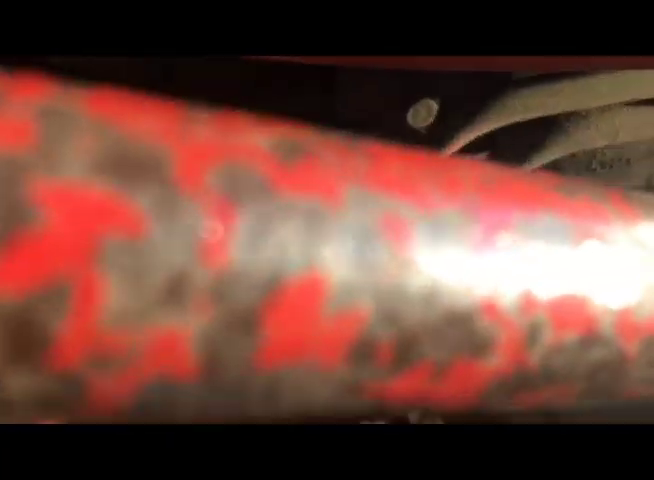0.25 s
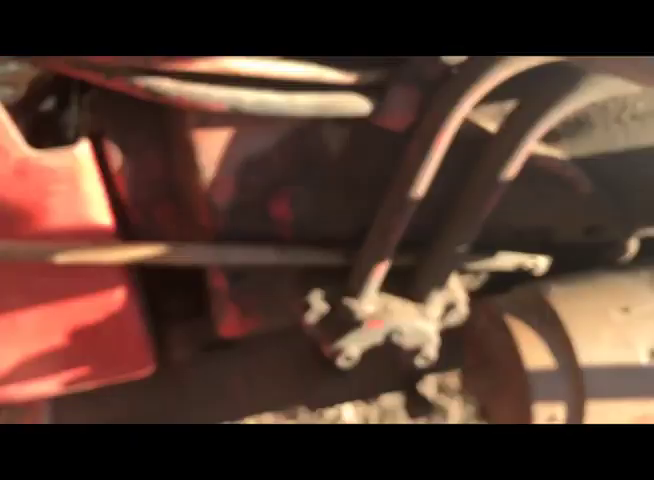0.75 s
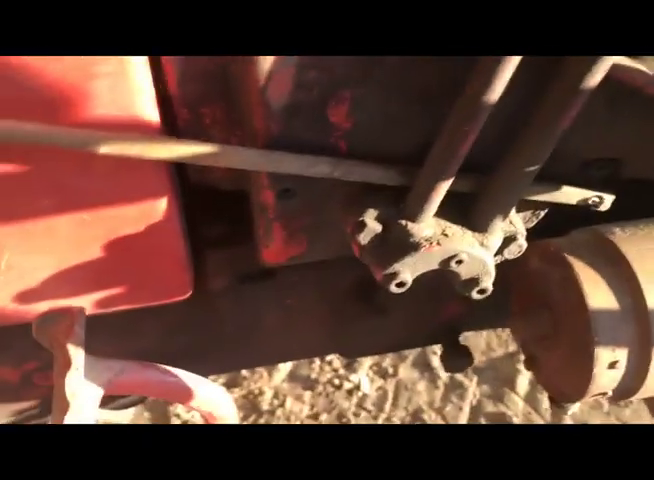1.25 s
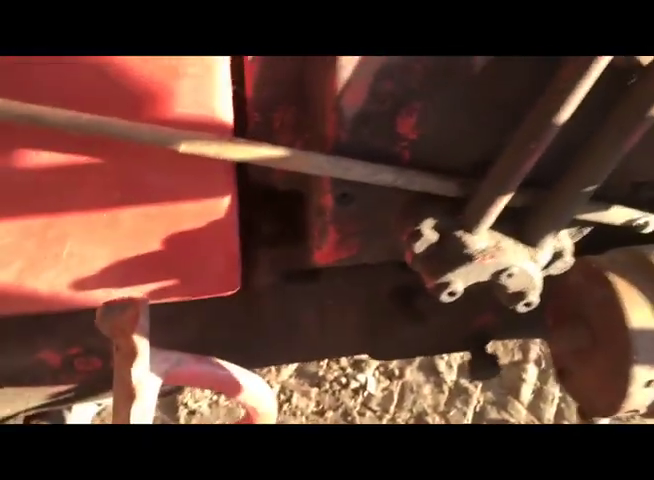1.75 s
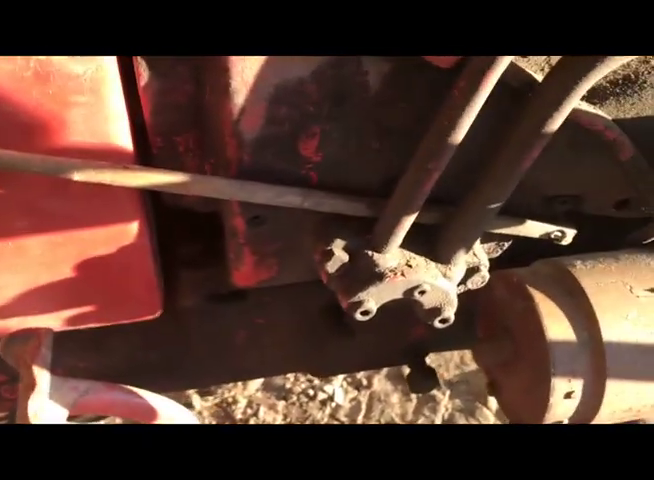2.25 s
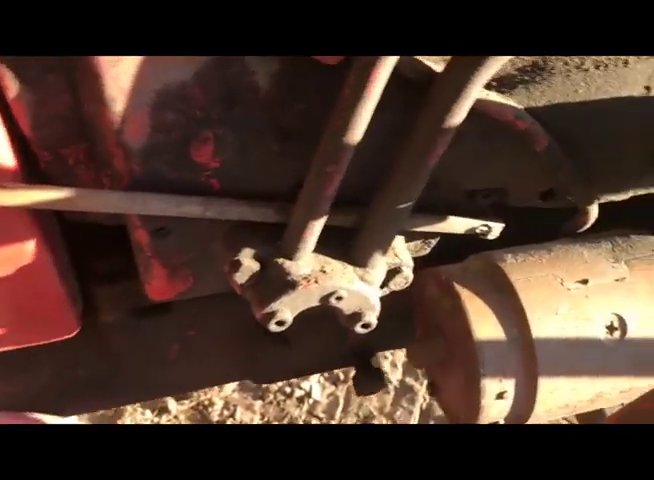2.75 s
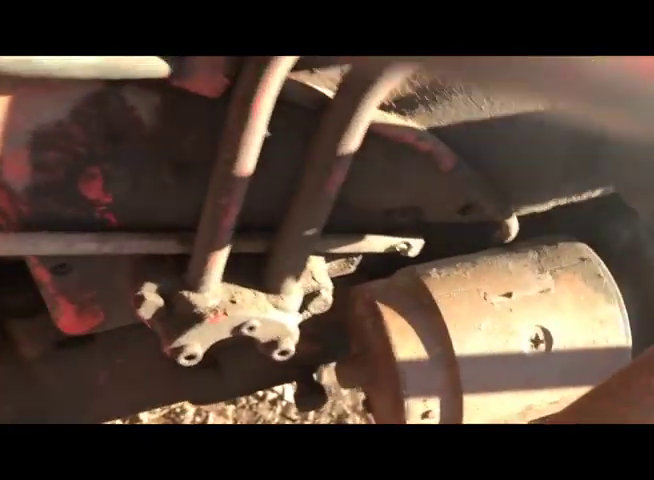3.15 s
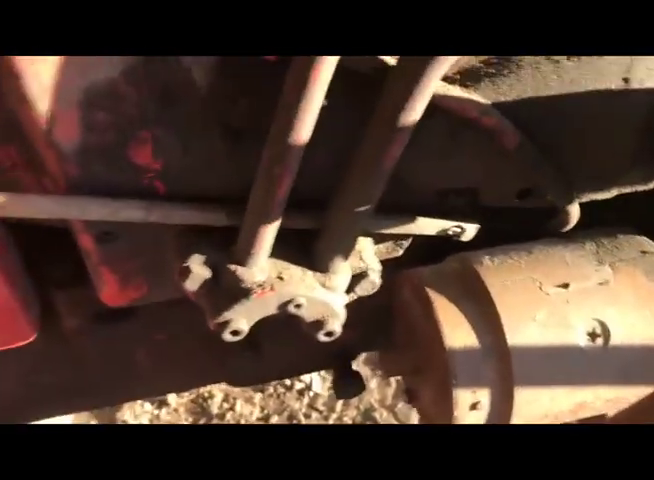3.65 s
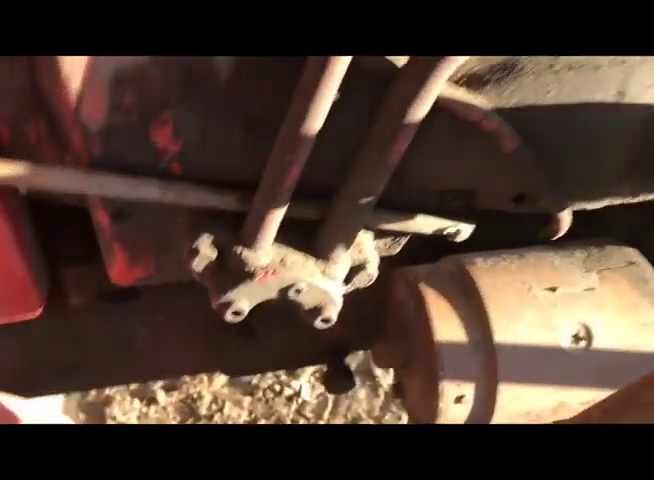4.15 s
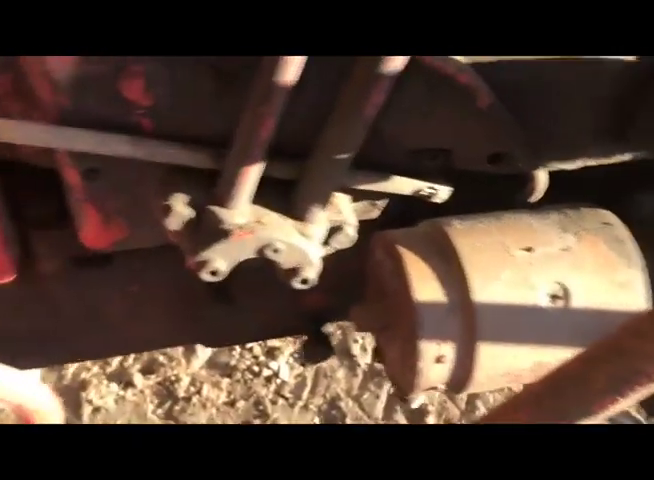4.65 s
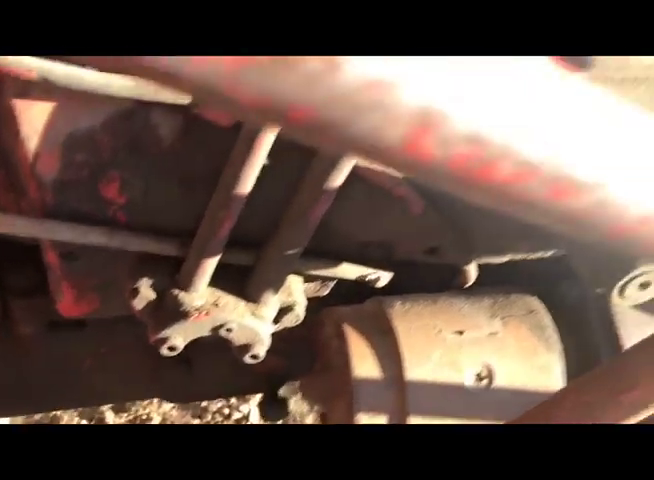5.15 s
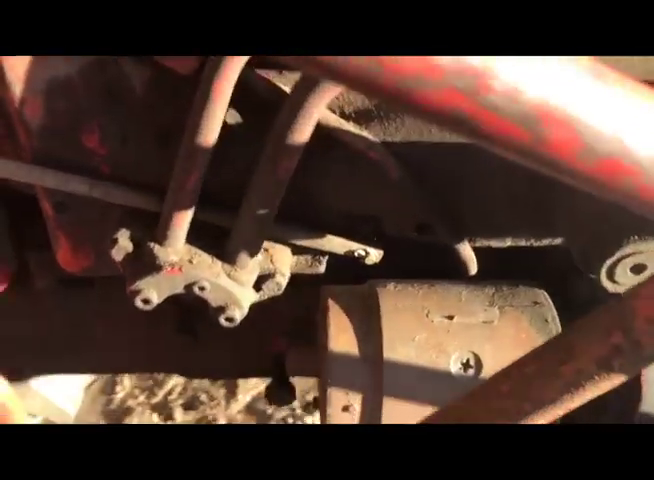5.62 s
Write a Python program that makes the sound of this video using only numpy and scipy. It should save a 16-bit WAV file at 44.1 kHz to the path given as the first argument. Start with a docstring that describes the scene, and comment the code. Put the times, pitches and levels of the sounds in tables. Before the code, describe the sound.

After a few light metal clicks, a tractor's electric starter motor kicks in with a sharp clack and spins freely, its whine rising fast and then winding down with a rhythmic scrape. A steel linkage clacks several times, and the starter spins again, faster, and coasts down. The engine never turns over. It is close to the microphone, outdoors, with gusts of wind thumping over a soft hush.

```python
"""Tractor starter in a breeze

A starter motor spins up freely twice and coasts down, close to the microphone. Brushes sing on the
commutator bars, the worn shaft scrapes once a turn and the steel housing roars and rings. Around the
spins a linkage clacks and a loose part tinkles; wind thumps on the microphone over a soft hush."""
import sys
import numpy as np
from scipy.fft import rfft, irfft, next_fast_len
from scipy.io import wavfile
from scipy.ndimage import uniform_filter1d, map_coordinates

SR = 44100
rng = np.random.default_rng(int(sys.argv[2]) if len(sys.argv) > 2 else 0)


def int16_out(signal):
    """Quantize to a 16-bit WAV file."""
    q = np.round(np.clip(np.atleast_2d(signal).T, -1, 1) * 32767)
    wavfile.write(sys.argv[1], SR, q.astype(np.int16))


N = 259552
TIME = np.arange(N) / SR

# The two spins. Each row: switch-on and switch-off in seconds, kick and free shaft speed in Hz, run-up
# time constant in seconds, dry drag in Hz per second, a moment in seconds when the high spot bites.
SPINS = [(1.498, 1.73, 13.5, 63.5, .078, 49.5, 2.583), (4.414, 4.78, 13, 92.7, .187, 47, 5.766)]
# The mix, before speed shapes it. Each row is a spin: roar, scrape and whine level in dB.
SPIN_MIX = [(-22.5, -23.5, -27.5), (-23.5, -21.5, -26.5)]
# Character. Each row is a spin: hum in dB, brush bounce as a factor, housing lift on the scrape in dB.
SPIN_CHARACTER = [(-42, .7, 15), (-33.5, .36, 9)]
# Tonal trims. Each row is a spin: housing ring in dB, trims of the low and the high bar tones in dB.
SPIN_TRIMS = [(-32, -3, -5), (-36, 3, 0)]
# Armature shudders. Each row: start in seconds, roar boost in dB, scrape boost in dB, decay in seconds.
SHUDDERS = [(1.493, 9.5, 7, 0.16), (4.631, 6.5, 2.5, 0.053), (4.882, -4.5, 1.5, 0.089)]
# Bar tones. Each row: multiple of the bar rate, level in dB, sideband fall in dB per shaft order.
BAR_TONES = [(1, 5, 6), (2, 0, 5), (3, -3.5, 3.5), (4, -5, 3.5)]
# Resonances the whine sweeps through. Each row: centre and width in Hz, then weight in dB running
# free and under starting current.
WHINE_MODES = [(975, 390, 2, 7.5), (1415, 56, 1.5, 5.5), (2196, 480, -1.5, 9), (3680, 470, 6, -11),
               (4040, 440, 1.5, -6), (4550, 240, 1.5, 9), (5080, 180, 1.5, 9), (5860, 450, 0.5, 10.5),
               (7300, 690, 1, 14), (8400, 540, 4, 6)]
# Colour of the brush friction. Each row: frequency in Hz, level in dB.
BRUSH_EQ = [(2000, -26.5), (3500, -15.5), (4500, -13), (5480, -13), (7220, -2.5), (10200, 0.5),
            (11500, 0.5), (16000, -15.5)]
# Brush holder resonances. Each row: centre and width in Hz, weight in dB in spin one and in spin two.
HOLDER_MODES = [(6030, 140, -2, -4), (7250, 220, -3, -3), (8500, 260, -9, -2), (9065, 50, 1, -1),
                (11080, 300, -5, -3), (11820, 190, 4, 1)]
# Broad colour of the housing, one curve a spin. Each point: frequency in Hz, weight in dB.
HOUSING_EQ = [
    [(70, -36), (130, 0), (240, -1), (370, 3.5), (537, -9.5), (641, -5), (1280, -8), (1450, -3.5),
     (2400, -5), (2900, -16.5), (3500, -17), (4050, -7), (5100, -18.5), (9000, -18), (12000, -65.5)],
    [(70, -5.5), (130, -0.5), (240, 3), (383, 4), (556, -14), (641, -2.5), (1210, -5), (1420, -4.5),
     (2300, -2), (2850, -12), (3500, -21.5), (4050, -15.5), (5480, -16.5), (9000, -23), (12000, -34)],
]
# Housing resonances. Each row: centre in Hz, width in Hz, weight in dB.
HOUSING_MODES = [(162.3, 18, 5.5), (375, 260, -4), (616, 44, 7), (1072, 350, 6), (1459, 13, 8),
                 (2220, 160, -0.5), (3743, 730, 10.5), (5300, 130, -0.5), (6070, 150, 1), (7330, 720, -7.5),
                 (13100, 200, -14)]
# Bands the housing hardly radiates. Each row: centre in Hz, width in Hz, depth in dB.
HOUSING_NOTCHES = [(2900, 70, 8), (10480, 690, 9), (12160, 420, 5), (13500, 430, 6)]
# Linkage hits, plus two rows (1.785 s, 4.811 s) where the spinning-down motor shakes the link's low ring with
# next to no crack. Each row: start in seconds, then level in dB of the crack and the low, dull, bright rings.
CLACKS = [(0.3289, -35, -40.5, -32.5, -46), (.992, -51, -70, -62, -60), (1.007, -55, -70, -62, -59),
          (1.0608, -73, -41, -64, -64), (1.093, -46, -48, -62, -50), (1.167, -29.5, -32, -56, -33),
          (1.18, -47, -55, -28, -36), (1.263, -48, -35.5, -43, -48), (1.501, -13.5, -39, -21, -26),
          (1.785, -76, -9.5, -80, -80), (2.865, -43, -51, -40, -42), (3.1647, -37.5, -65, -64, -43),
          (3.195, -48, -67, -62, -46), (3.259, -38, -60, -40, -26), (3.3262, -62, -31.5, -41, -61),
          (3.3998, -29, -27, -51, -33), (3.408, -80, -18, -80, -80), (3.493, -30, -28, -15, -22),
          (3.504, -40, -49, -20, -40), (3.514, -33, -52, -35, -45), (3.858, -45, -40, -53, -46),
          (3.897, -71, -52, -67, -49), (3.9224, -47, -45, -42, -52), (4.013, -42, -51, -48, -44),
          (4.042, -25.5, -17, -56, -19.5), (4.067, -20.5, -11, -21, -22.5), (4.192, -45.5, -34.5, -56, -63),
          (4.364, -46, -47, -48, -54), (4.38, -38, -33, -54, -36), (4.3958, -29, -38, -35, -24),
          (4.4159, -14, -42, -41, -37), (4.423, -10, -23, -13, -42), (4.811, -80, -16.5, -80, -80)]
# Modes of the steel link. Each row: pitch in Hz, level in dB, time to fall 60 dB in seconds.
LINK_MODES = [(370, 3, .1), (1140, -8, .08), (1375, -1, .08), (1800, -8, .1), (2250, -12, .16),
              (2750, -9, .03), (3000, -2, .04), (3360, -3, .2), (3690, -8, .05), (4300, -9, .03),
              (6050, -7, .03)]
# Colour of a hit's crack. Each row: frequency in Hz, level in dB.
CRACK_EQ = [(500, 0.5), (1500, 4.5), (4000, 3.5), (8000, -4), (16000, -17)]
# Modes of the loose part. Each row: pitch in Hz, level in dB, time to fall 60 dB in seconds.
TINKLE_MODES = [(7084, -9, .08), (7461, 0, .06), (8134, -12, .04), (12990, -8, .08)]
# Fader ride of the wind. Each row: time in seconds, level in dB.
GUSTS = [(0, -48), (.52, -50.5), (.6, -46.5), (.92, -45.5), (1.02, -56), (1.27, -45.5), (1.42, -55.5),
         (1.9, -34), (2.2, -43), (2.62, -29), (2.9, -35.5), (3.36, -38.5), (3.46, -67), (3.61, -24.5),
         (3.74, -28), (3.97, -32), (4.2, -29), (4.27, -36), (4.42, -24), (4.6, -39), (5.89, -49)]
# The featured wind thumps. Each row: centre in seconds, level in dB, pitch in Hz.
THUMPS = [(2.459, -12, 201), (2.508, -17, 186), (2.637, -31, 90), (2.811, -9, 126), (2.858, -21, 138),
          (2.991, -21.5, 101), (3.114, -19.5, 151), (3.615, -12.5, 111), (3.657, -9, 140),
          (3.672, -11, 262), (3.695, -13, 330), (3.707, -14, 82), (3.796, -18, 113), (3.888, -13, 84.5),
          (4.36, -22, 72), (4.376, -14, 148), (4.418, -12, 84.5), (4.466, -13, 218), (4.53, -16, 86.5)]
# Colour of the buffeting. Each row: frequency in Hz, level in dB.
BUFFET_EQ = [(12, -41), (25, -9), (60, 10), (170, -9.5), (330, -11), (500, -27.5), (1100, -49)]
# Swells in the air. Each row: peak time, rise and fall in seconds, hush and rustle level in dB.
AIR_SWELLS = [(0, .1, 0.14, -50.5, -58.5), (.36, 0.052, 0.07, -51.5, -60), (1.16, 0.097, 0.11, -60, -53.5),
              (3.3, 1, 0.36, -59, -56.5), (3.43, 0.046, 0.095, -54, -47.5), (3.559, 0.077, 0.027, -41, -37),
              (4.092, 0.06, 0.058, -38.5, -45.5)]
# Colours of the far hush and the near rustle. Each row: frequency in Hz, level in dB.
HUSH_EQ = [(88, -13.5), (150, -7), (290, -12.5), (972, -15.5), (4000, -39), (5200, -66), (8800, -120)]
RUSTLE_EQ = [(710, -11), (1200, -7.5), (4860, -15), (6950, -16.5), (16000, -26)]

BARS, REF_HZ = 27, 60  # commutator bars; shaft speed at which scrape, whine and ring levels are set
ORDERS = np.arange(5 * BARS)  # harmonics of the shaft speed


def amp(db):
    return 10 ** (np.asarray(db) / 20)


def unit(x):
    return x / np.sqrt(np.mean(x ** 2) + 1e-20)


def along(points, hz):
    """(Hz, value) points on a log axis."""
    f, v = np.transpose(points)
    return np.interp(np.log(hz + 1), np.log(f + 1), v)


def curves(rows):
    """One value per sample for each column after the time."""
    s, *cols = np.transpose(rows)
    return [np.interp(TIME, s, c) for c in cols]


def wobble(rate):
    """A smooth random curve, rate knots a second."""
    return map_coordinates(rng.standard_normal(int(N * rate / SR) + 4), [TIME * rate])


def filtered(x, response):
    """x times a response of frequency."""
    m = next_fast_len(len(x) + 8192)
    return irfft(rfft(x, m) * response(np.fft.rfftfreq(m, 1 / SR)), m)[:len(x)]


def noise(spectrum, size=N):
    """Coloured noise of rms 1."""
    return unit(filtered(rng.standard_normal(size), lambda hz: amp(along(spectrum, hz))))


def starter_spin(timing, mix, character, trims, housing_eq, holder_column):
    """One spin of the motor: the shaft's speed and angle drive the layers."""
    *drive, bite_s = timing
    on_s, off_s = drive[:2]
    roar_db, scrape_db, whine_db = mix
    hum_db, bounce, housing_lift_db = character
    ring_db, low_trim_db, high_trim_db = trims
    shaft_hz = uniform_filter1d(shaft_speed(*drive), size=800)
    turning = (TIME >= on_s) & (shaft_hz > .7)
    turns = np.cumsum(shaft_hz) / SR
    turns -= np.interp(bite_s, TIME, turns)

    roar_db += 20 * 2.18 * np.log10(shaft_hz / (shaft_hz + 2.17))  # holds up until the last slow turns
    whine_db += 20 * 2.1 * np.log10(shaft_hz / REF_HZ)
    scrape_db += 0.2 * (shaft_hz - REF_HZ)
    scrape_db += 2 * np.exp(-np.maximum(TIME - off_s, 0) / 0.025)  # brushes are louder under current
    scrape_db -= 20 * np.log10(1 + np.exp(0.39 * (10.2 - shaft_hz)))  # fades out below about 10 Hz
    for start_s, roar_boost_db, scrape_boost_db, decay_s in SHUDDERS:
        shudder = fading(start_s, decay_s)
        roar_db += roar_boost_db * shudder
        scrape_db += scrape_boost_db * shudder

    scrape = amp(scrape_db) * brush_scrape(shaft_hz, turns, housing_lift_db, holder_column)
    chatter = rng.standard_normal(N) * amp(0.34 * np.cos(2 * np.pi * turns) + 2.04 * wobble(150))
    roar = amp(roar_db) * housing_roar(chatter, shaft_hz, housing_eq)
    whine = amp(whine_db) * bar_whine(turns, turning, on_s, bounce, low_trim_db, high_trim_db)
    hum = amp(hum_db) * armature_hum(shaft_hz, turns, turning, housing_eq)
    ring = amp(ring_db) * housing_ring(chatter, shaft_hz)
    motor = filtered(ring + roar + scrape + whine + hum, housing_notches)
    return motor * uniform_filter1d(turning * 1., size=300)


def shaft_speed(on_s, off_s, kick_hz, free_hz, rise_s, dry_drag):
    """Turns a second: the shaft runs up under power, then dry and viscous drag wind it down."""
    viscous_per_s, creep_hz = .27, 4
    powered = free_hz - (free_hz - kick_hz) * np.exp(-np.clip(TIME - on_s, 0, off_s - on_s) / rise_s)
    drag_hz = dry_drag / viscous_per_s
    speed = (powered + drag_hz) * np.exp(-viscous_per_s * np.maximum(TIME - off_s, 0)) - drag_hz
    return creep_hz * np.log1p(np.exp(speed / creep_hz)) + 1e-6  # creeps softly to rest


def bar_whine(turns, turning, on_s, bounce, low_trim_db, high_trim_db):
    """Brushes sing on the commutator; uneven bars smear each tone over the nearby shaft orders."""
    skirts_db = []
    for multiple, db, fall_db in BAR_TONES:
        offset = ORDERS - multiple * BARS
        lower_slope = 1 if multiple == 1 else .45  # the overtones' lower skirts reach further
        skirts_db.append(db - fall_db * np.maximum(offset, -offset * lower_slope))
    order_db = np.max(skirts_db, axis=0)
    order_db += low_trim_db * (ORDERS < 1.4 * BARS) + high_trim_db * (ORDERS > 3.3 * BARS)
    buzz = per_turn(order_db, turns + .003 * bounce * wobble(90), drift=bounce, rate=40)
    throb_db = 2 * np.cos(2 * np.pi * (turns - 0.37))
    buzz *= turning * amp(throb_db + 1.67 * wobble(45))
    modes = np.array(WHINE_MODES)
    free = filtered(buzz, lambda hz: resonant(hz, modes[:, [0, 1, 2]], lift_db=15) ** 1.8)
    loaded = filtered(buzz, lambda hz: resonant(hz, modes[:, [0, 1, 3]], lift_db=15) ** 1.8)
    current = fading(on_s, decay_s=0.094)  # the starting surge crossfades the two colours
    return ((1 - current) * free + current * loaded) / np.std(free)


def brush_scrape(shaft_hz, turns, housing_lift_db, holder_column):
    """The brush bites at the high spot, drags and lets go, ringing its holder; speed blurs the bite."""
    phase = turns % 1
    depth_db = 42 * np.exp(-(shaft_hz / 23) ** 2) + 4
    release = 1 / (1 + np.exp((.45 - phase) / .05))
    bite = amp(-depth_db * (0.27 * phase + 0.3 * release) + 1.1 * wobble(100))
    bite /= np.sqrt(np.abs(uniform_filter1d(bite ** 2, size=6000)))  # evens out the running level
    friction = unit(filtered(noise(BRUSH_EQ), lambda hz: resonant(hz, HOUSING_MODES, housing_lift_db)))
    modes = np.array(HOLDER_MODES)[:, [0, 1, holder_column]]
    holder = unit(filtered(rng.standard_normal(N), lambda hz: resonant(hz, modes, lift_db=25) ** 2))
    holder_db = -13 + 5 * np.cos(2 * np.pi * (turns - .15))
    return bite * (friction + amp(holder_db) * holder)


def housing_roar(chatter, shaft_hz, housing_eq):
    """Bearing and brush chatter fills the housing; the roar loses its top as the shaft slows."""
    roar = through_housing(chatter, housing_eq, colour=0.94)
    treble = filtered(roar, lambda hz: 1 / (1 + (2800 / (hz + 1)) ** 8))
    cut_db = 14 * np.exp(-(shaft_hz / 7) ** 2)
    return roar - treble * (1 - amp(-cut_db))


def housing_ring(chatter, shaft_hz, pitch_hz=1465, width_hz=40):
    """Chatter excites the housing's strongest ring, one steady pitch that grows louder with speed."""
    ring = unit(filtered(chatter, lambda hz: 1 / (1 + (2 * (hz - pitch_hz) / width_hz) ** 2)))
    return ring * amp(2.5 * wobble(15)) * (shaft_hz / REF_HZ) ** .7


def armature_hum(shaft_hz, turns, turning, housing_eq):
    """The unbalanced armature knocks at every turn, harder the faster it runs."""
    order_db = -40 * (ORDERS == 0) - .2 * ORDERS - 3 * np.maximum(ORDERS - 12, 0)
    knocks = per_turn(order_db, turns, drift=.7, rate=25)
    knocks *= (shaft_hz / shaft_hz.max()) ** 2
    return through_housing(knocks * turning, housing_eq, colour=.6)


def through_housing(x, eq, colour):
    """The steel shell colours a sound, returned at rms 1; colour under 1 softens the effect."""
    return unit(filtered(x, lambda hz: (amp(along(eq, hz)) * resonant(hz, HOUSING_MODES, 10)) ** colour))


def housing_notches(hz):
    """Gain that scoops out the bands the housing hardly radiates."""
    return amp(-sum(db * np.exp(-((hz - centre) / width) ** 2) for centre, width, db in HOUSING_NOTCHES))


def per_turn(order_db, turns, drift, rate):
    """A wavetable played once a turn; three more with the same order levels drift in and out."""
    shapes = irfft(amp(order_db) * np.exp(2j * np.pi * rng.random((4, len(order_db)))), 4096)
    played = [np.interp(turns % 1, np.arange(4096) / 4096, shape, period=1) for shape in shapes]
    return played[0] + drift * sum(wobble(rate) * layer for layer in played[1:])


def resonant(hz, modes, lift_db):
    """Gain of (Hz, width, dB) resonances over a flat base."""
    return np.sqrt(1 + sum(amp(lift_db + db) ** 2 / (1 + (2 * (hz - centre) / width) ** 2)
                           for centre, width, db in modes))


def fading(start_s, decay_s):
    """An envelope that jumps from 0 to 1 and dies away."""
    return (TIME >= start_s) * np.exp(-np.abs(TIME - start_s) / decay_s)


def linkage(held_from_s=1.0, held_t60=.05):
    """Each contact, or shake from the motor, cracks and rings the steel link; once it is held, its upper modes
    are choked."""
    out, t = np.zeros(N + SR), np.arange(SR // 4) / SR
    for start_s, crack_db, low_db, dull_db, bright_db in CLACKS:
        held = start_s > held_from_s
        crack_eq = [(hz, along(CRACK_EQ, hz) + rng.normal(0, 4)) for hz in np.geomspace(500, 16000, 24)]
        envelope = amp(crack_db - 60 * t / 0.055) * (1 - np.exp(-t / 0.002))
        clack = envelope * noise(crack_eq, size=len(t))
        for hz, db, t60 in LINK_MODES:
            upper = hz > 500
            db += low_db if hz < 500 else dull_db if hz < 2600 else bright_db
            hz *= 1 + upper * rng.normal(0, .025 if held else .01)  # the link sits anew at each blow
            db += upper * rng.normal(0, 3.5)
            if held and upper:
                t60 = min(t60, held_t60)
            attack = 1 - np.exp(-t * hz)
            clack += amp(db - 60 * t / t60) * attack * np.sin(2 * np.pi * hz * t)
        out[round(start_s * SR):][:len(t)] += clack
    return out[:N]


def tinkle(start_s=1.2215, level_db=-47):
    """A small loose steel part is touched once and rings."""
    t = np.maximum(TIME - start_s, 0)
    return sum(amp(level_db + db - 60 * t / t60) * np.sin(2 * np.pi * hz * t)
               for hz, db, t60 in TINKLE_MODES)


def wind(small_per_s=8.7):
    """Lumpy buffeting on the microphone, with featured pressure thumps and small ones riding the gusts."""
    gust_db, = curves(GUSTS)
    buffet = amp(gust_db) * unit(amp(3.7 * wobble(30)) * noise(BUFFET_EQ))
    small = [(when * TIME[-1], gust_db[int(when * N)] + 13 - 8 * softness, 70 + 90 * pitch)
             for when, softness, pitch in rng.random((round(small_per_s * N / SR), 3))]
    t = np.arange(-1500, 1500) / SR
    thumps = np.zeros(N + len(t))
    for centre_s, db, hz in list(THUMPS) + small:
        push = np.cos(2 * np.pi * hz * t) * np.exp(-(t * hz / 0.33) ** 2)
        crest = 1.3 * amp(db) * hz / 250 / (1 + (t / 0.0004) ** 2)  # sharp edge on strong, quick pushes
        thumps[round(centre_s * SR):][:len(t)] -= amp(db) * (push + crest)
    return buffet + thumps[len(t) // 2:][:N]


def air():
    """A far low hush and a brighter rustle close by; both swell when something brushes near."""
    hush_gain, rustle_gain = amp(-56.5), amp(-63)
    for peak_s, rise_s, fall_s, hush_db, rustle_db in AIR_SWELLS:
        swell = np.exp(-((TIME - peak_s) / np.where(TIME < peak_s, rise_s, fall_s)) ** 2)
        hush_gain += amp(hush_db) * swell
        rustle_gain += amp(rustle_db) * swell
    hush = hush_gain * amp(2.4 * wobble(28)) * noise(HUSH_EQ)
    rustle = rustle_gain * amp(2.0 * wobble(35)) * noise(RUSTLE_EQ)
    return hush + rustle


def scene():
    """The mono mix: two spins up front, then linkage, tinkle, wind and air."""
    spins = zip(SPINS, SPIN_MIX, SPIN_CHARACTER, SPIN_TRIMS, HOUSING_EQ, (2, 3))
    motor = sum(starter_spin(*settings) for settings in spins)
    return (motor + linkage() + tinkle() + wind() + air())[None]


def record(dry):
    """Soft-clips the peaks at full scale, then trims the sub-bass and the very top."""
    low_cut_hz, high_cut_hz = 28, 15780
    soft = dry[0] / (1 + np.abs(dry[0]) ** 8) ** (1 / 8)
    return filtered(soft, lambda hz: (hz < high_cut_hz) / (1 + (low_cut_hz / (hz + 1)) ** 4))[None]


dry = scene()
out = record(dry)
int16_out(out)
```